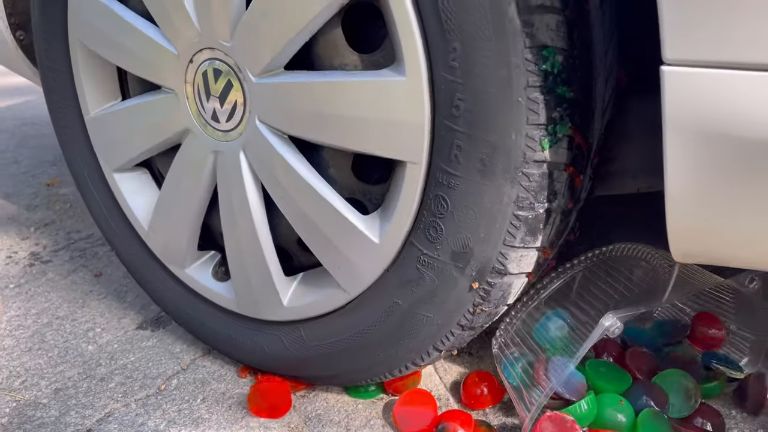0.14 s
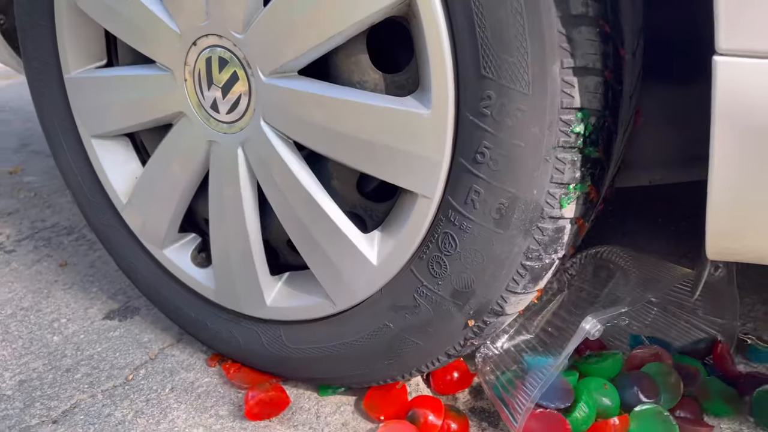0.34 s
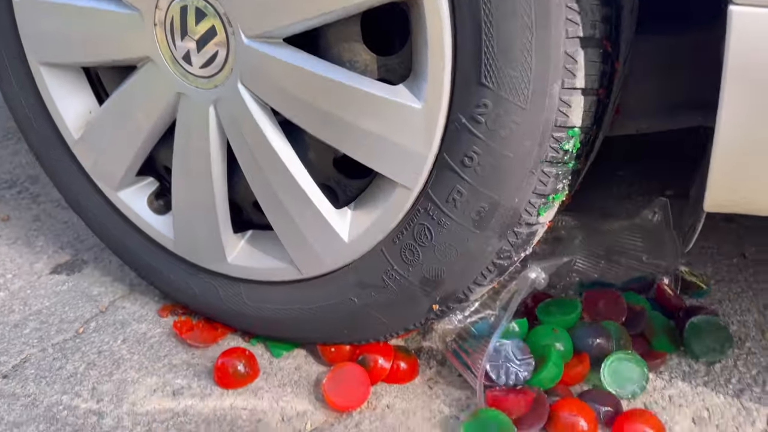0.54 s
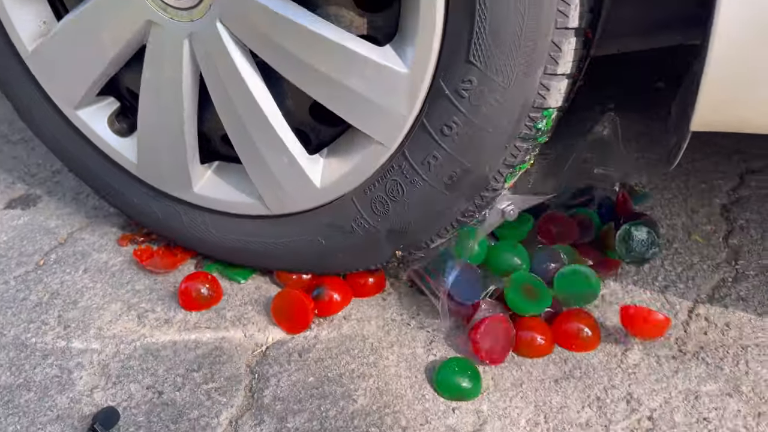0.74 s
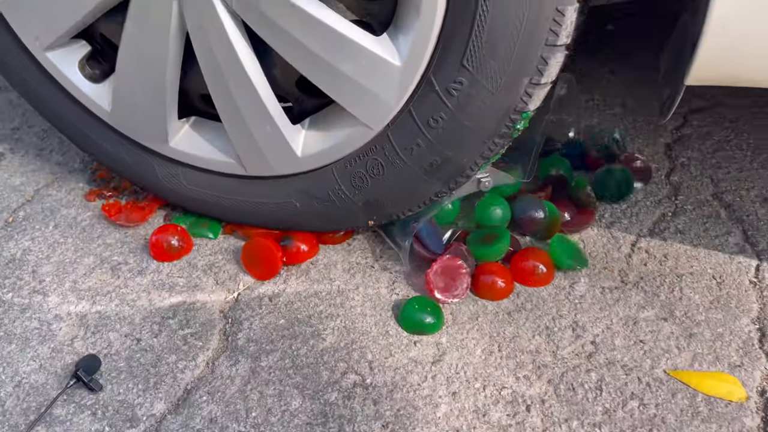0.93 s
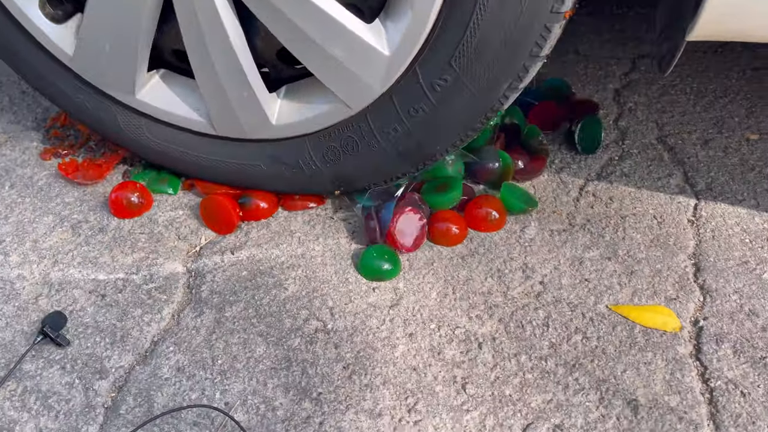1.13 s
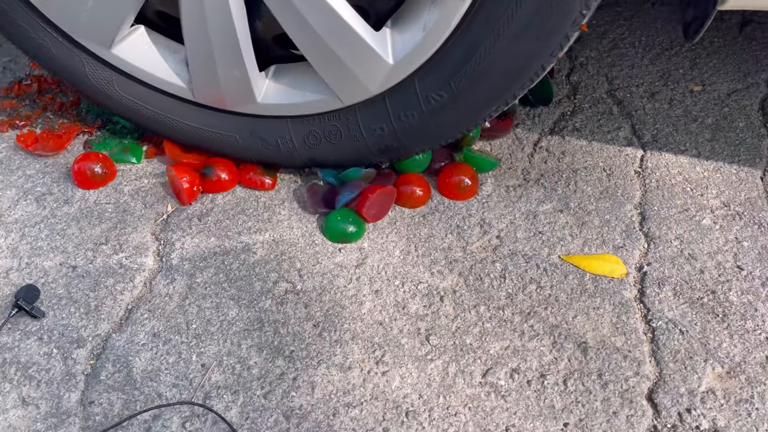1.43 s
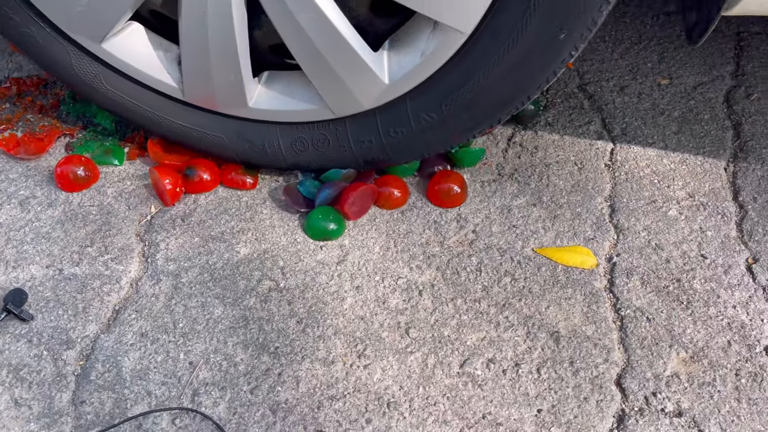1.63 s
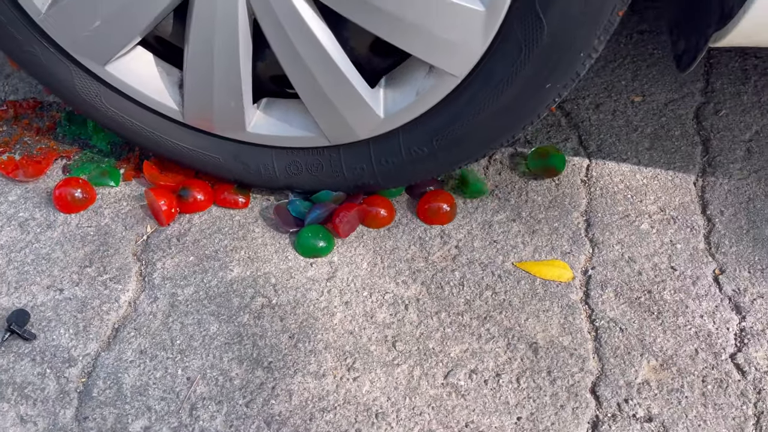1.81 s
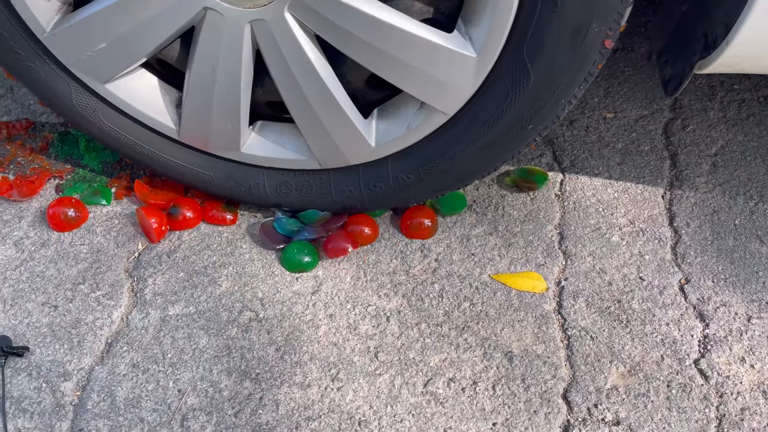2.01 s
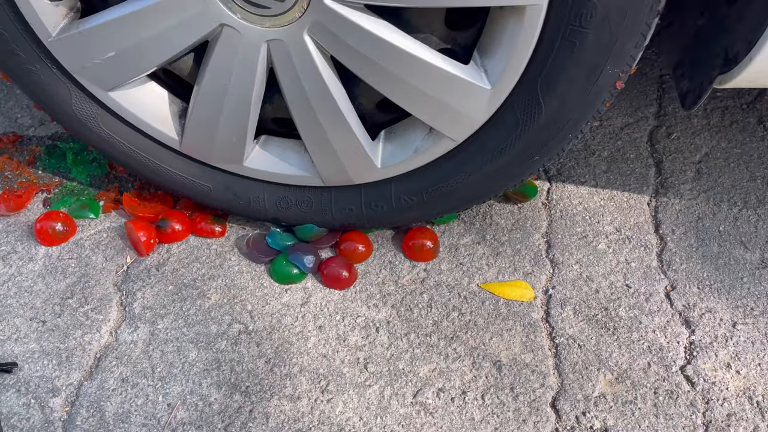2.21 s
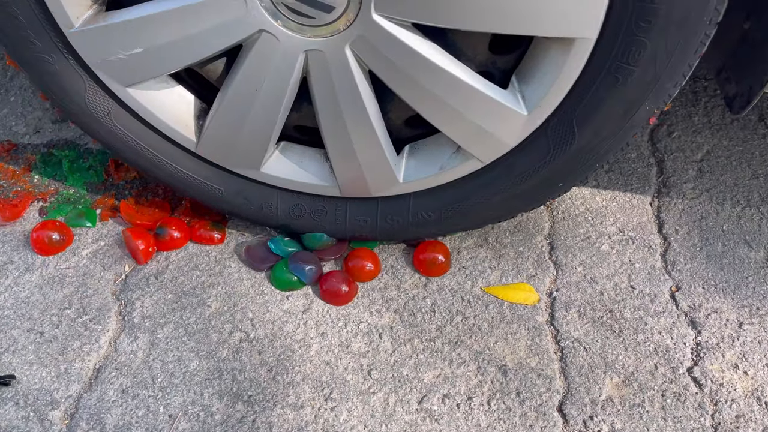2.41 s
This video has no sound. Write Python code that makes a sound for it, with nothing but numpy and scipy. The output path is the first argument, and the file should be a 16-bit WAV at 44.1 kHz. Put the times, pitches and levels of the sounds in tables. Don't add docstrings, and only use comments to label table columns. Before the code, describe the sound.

Car tyre crushing a thin plastic tray of small filled cups outdoors, very close microphone; near silence, then dense sharp snaps and hollow pops, thinning to sparse crackles, faint sticky ticks and a last light crackling.

```python
import sys
import numpy as np
from scipy import signal
from scipy.fft import rfft, irfft, next_fast_len
from scipy.io import wavfile
from scipy.ndimage import uniform_filter1d, map_coordinates

SR = 44100
rng = np.random.default_rng(int(sys.argv[2]) if len(sys.argv) > 2 else 0)


def elevation(decibels):
    levels = np.asarray(decibels, float)
    return 10 ** (levels / 20)


def digitize_waveform(pressure):
    field = np.atleast_2d(pressure).T
    bounded = np.clip(field, -1, 1)
    quanta = np.round(bounded * 32767).astype(np.int16)
    wavfile.write(sys.argv[1], SR, quanta)


N = 112454
T = np.arange(N) / SR

# (time [s], level [dB], pitch [Hz], life [ms])
TRAY_BUCKLES = [(0.18, -36.5, 766, 107), (0.234, -16.5, 2300, 9.1), (0.253, -16, 1850, 6.4),
                (0.283, -8, 1460, 11.5), (0.33, -12, 2060, 4.3), (0.34, 1.5, 2590, 1.3),
                (0.3797, -13.5, 1855, 14.6), (0.411, -10.5, 2430, 6.6), (0.4288, -4.5, 2240, 2.7),
                (0.4731, -7.5, 1190, 7), (0.4943, -2, 1007, 4.2), (0.5114, -11.5, 1334, 20),
                (0.5613, -4.5, 1780, 9.7), (0.5993, -7.5, 2420, 2), (0.63, -2, 1495, 4.3),
                (0.6579, -12.5, 1590, 5.4), (0.6776, -5, 1674, 4.1), (0.6882, -2.5, 2040, 3.9),
                (0.6958, -11.5, 729, 12.4), (0.7426, -9.5, 950, 31.5), (0.755, 1, 2198, 5.1),
                (0.9576, -14.5, 1710, 4)]
# (time [s], level [dB], pitch [Hz], life [ms])
CUP_BUCKLES = [(0.9774, -7, 2320, 2.6), (1.0311, -10.5, 2050, 4.9), (1.1291, -32, 1500, 12),
               (1.1814, -11, 1598, 9.9), (1.2447, -5, 1503, 6.9), (1.4005, -24.5, 2410, 7.4),
               (1.4203, -11, 1757, 7.1), (1.4384, -7, 2625, 4.1), (1.458, -15, 2150, 8.1),
               (1.5218, -15.5, 1843, 6.8), (1.5314, -14, 1195, 9.9), (1.546, -18, 2120, 8.7),
               (1.5643, -19.5, 1890, 5), (1.6265, -28, 2810, 24), (1.6454, -19.5, 2100, 5.6),
               (1.812, -39, 970, 27), (1.8977, -22.5, 1810, 3), (1.9523, -27, 1094, 19),
               (1.9923, -19, 1570, 3.4), (2.0054, -16.5, 1140, 3.4)]
HOLLOW_HZ, HOLLOW_DB = 517, -9


def buckles():
    s, db, hz, ms = np.vstack([TRAY_BUCKLES, CUP_BUCKLES]).T
    pops = bursts(s, db, hz, ms * 0.00067, spread=0.55, off_db=6, rattle=0.78, rise=0.12, count=11)
    s, db, hz, ms = np.transpose(TRAY_BUCKLES)
    boom = bursts(s, db + HOLLOW_DB, HOLLOW_HZ, ms / 1000,
                  spread=0.5, off_db=3, rattle=0.92, rise=0.35, count=5)
    return pops + boom


# (time [s], level [dB], pitch [Hz])
FRONT_SNAPS = [(0.1514, -22, 11030), (0.2346, -8.5, 4350), (0.2714, -7, 9080), (0.2835, -5, 4700),
               (0.3178, -12.5, 7200), (0.3489, 0, 8260), (0.3551, -3, 9600), (0.3819, -3, 7950),
               (0.4116, -6, 7560), (0.428, 2.5, 8460), (0.5122, 12.5, 7410), (0.5225, -1.5, 6690),
               (0.5449, -9, 6900), (0.5572, -4, 7940), (0.561, 10, 6700), (0.6304, 4, 3770),
               (0.6475, -6.5, 7800), (0.6622, -6, 6400), (0.6695, -5, 4420), (0.6788, 7, 9820),
               (0.6882, 13.5, 4635), (0.7423, 3, 4740), (0.7549, 11, 5025)]
# (time [s], level [dB], pitch [Hz])
MIDDLE_SNAPS = [(0.7899, -3, 6700), (0.8167, -3.5, 4770), (0.8404, -3, 8320), (0.8561, 3, 4650),
                (0.8849, -0.5, 8750), (0.9105, -5, 10150), (0.9273, -5.5, 7000), (0.9709, -4.5, 6470),
                (0.9771, 0.5, 6500), (1.0097, -1, 7800), (1.024, -18, 7900), (1.031, 0, 7000),
                (1.0446, 0, 9400), (1.0621, 0, 5960), (1.0736, 1.5, 4140), (1.0917, -14, 7860),
                (1.1326, -5.5, 6920), (1.145, -5.5, 5480), (1.204, -9, 6120), (1.2446, 5, 4110)]
# (time [s], level [dB], pitch [Hz])
LAST_SNAPS = [(1.2605, -9.5, 8900), (1.2853, -6, 3950), (1.2966, -8, 6800), (1.3163, -12, 5000),
              (1.3811, -12, 7060), (1.4382, -5, 3880), (1.479, -4, 3580), (2.088, -19.5, 12000),
              (2.1372, -12.5, 11150), (2.1572, -14.5, 5900), (2.175, -8.5, 8900), (2.199, -13.5, 8500),
              (2.2058, -16.5, 6050), (2.2269, -13, 10100), (2.234, -15, 6700), (2.263, -10, 8900),
              (2.2705, -19, 5800), (2.3074, -13.5, 6600), (2.3971, -12, 6630), (2.4389, -12.5, 4140),
              (2.4661, -13.5, 7900)]
SHIVER_DB = [
    -12.5,
    -14,
    -26,
]


def snaps():
    groups = FRONT_SNAPS, MIDDLE_SNAPS, LAST_SNAPS
    s, db, hz = np.vstack(groups).T
    crack = bursts(s, db + 4, hz, 0.00072,
                   spread=0.439, off_db=10.5, rattle=0, rise=0.047, count=15, in_step=True)
    shiver_db = db + np.repeat(SHIVER_DB, [len(g) for g in groups])
    shiver = bursts(s, shiver_db, hz * 0.8, 0.0048, spread=0.6, off_db=0.5, rattle=1.1, rise=0.1, count=17)
    return crack + shiver


# (time [s], level [dB], pitch [Hz])
SPLINTERS = [(0.0773, -31, 9900), (0.1879, -28.5, 3340), (0.2775, -8, 2820), (0.296, -18, 6090),
             (0.3317, -10, 3730), (0.3386, -7, 2800), (0.4686, -6, 3520), (0.4739, -4, 3140),
             (0.5274, -10, 3600), (0.55, -11, 9700), (0.5922, -8, 3290), (0.6006, -9, 2780),
             (0.6575, -4.5, 3190), (0.8293, -7, 2820), (0.8364, -13, 3920), (0.9312, -9, 3570),
             (0.9585, -6, 2870), (1.0014, -6.5, 5490), (1.0586, -10, 8900), (1.068, -7, 4220),
             (1.0802, -9, 4130), (1.1121, -14, 5640), (1.1289, -10, 3070), (1.1544, -12, 6930),
             (1.1807, -9, 2930), (1.2086, -13, 7250), (1.2371, -20, 3400), (1.25, -3, 3420),
             (1.2924, -10.5, 2800), (1.422, -16, 6360), (1.4587, -10, 2860), (1.5217, -14.5, 2820),
             (1.5446, -17.5, 3560), (1.6266, -22, 3210), (1.6466, -19, 4370), (1.8865, -19.5, 3100),
             (1.9224, -29, 6940), (1.9515, -32, 5230), (1.9724, -29, 3380), (1.9933, -28, 2820),
             (2.02, -21, 6250), (2.0933, -28, 4800), (2.13, -32, 5900), (2.1627, -21, 5490),
             (2.1816, -21, 5580), (2.2558, -15.5, 4050), (2.3268, -22, 4400), (2.4625, -17.5, 5730)]


def splinters():
    s, db, hz = np.transpose(SPLINTERS)
    body = bursts(s, db, hz, 0.0012, spread=0.386, off_db=9.5, rattle=0.22, rise=0.097, count=11)
    edge = bursts(s, db - 8, 9500, 0.0012, spread=0.245, off_db=6, rattle=0.27, rise=0.08, count=9)
    return body + edge


# (time [s], level [dB], pitch [Hz])
DENTS = [(.829, -11, 1790), (.8765, -10.5, 1600), (1.005, -14, 2500), (1.0466, -14.5, 1910),
         (1.109, -16.5, 3180), (1.8421, -27.5, 1210), (1.86, -25, 1870), (1.9379, -23, 1620),
         (2.186, -26.5, 1840)]
# (time [s], level [dB], pitch [Hz], life [ms])
RINGS = [(0.151, -24, 4580, 1.6), (.339, -6.5, 2430, 2.8), (.473, -7, 3300, 3), (.513, -10, 700, 6.4),
         (.535, -21.5, 732, 37), (.631, -14.5, 444, 10.6), (0.689, -11, 1850, 5.3), (.742, -10, 2170, 2.5),
         (1.128, -20, 1172, 8.1), (1.181, -7, 2910, 2.4), (1.813, -35, 983, 7.8), (1.951, -25.5, 978, 13)]


def rings():
    s, db, hz = np.transpose(DENTS)
    dents = bursts(s, db, hz, 0.0027, spread=0.412, off_db=6, rattle=1.0, rise=0.16, count=9)
    s, db, hz, ms = np.transpose(RINGS)
    panels = bursts(s, db, hz, ms / 1000, spread=0.053, off_db=5, rattle=0.45, rise=0.11, count=3)
    return dents + panels


SAG = 0.1104
JOLT = 40


def bursts(s, db, hz, life_s, spread, off_db, rattle, rise, count, in_step=False):
    t = np.arange(SR // 20) / SR
    out = np.zeros(N + SR)
    for s0, d, f, life in zip(*np.broadcast_arrays(s, db, hz, life_s)):
        z = rng.standard_normal((count, 4))
        away = np.linspace(-2, 2, count)[:, None] * (1 + z[:, :1] / 10)
        modes = np.clip(f * np.exp(spread * away), 100, SR * 0.4)
        lives = life * np.minimum(1, np.sqrt(f / modes))
        sagging_t = t - SAG * (t - life * (1 - np.exp(-t / life)))
        start = np.pi / 2 * np.sign(z[0, 2]) if in_step else z[:, 3:]
        phase = 2 * np.pi * modes * sagging_t + start
        jolts = np.repeat(rng.standard_normal((count, len(t) // JOLT + 1)), JOLT, 1)[:, :len(t)]
        jolts = uniform_filter1d(jolts, JOLT // 2, 1)
        level_db = -off_db * np.abs(away) + 2 * z[:, 1:2] - 10 * t / lives
        ring = (elevation(level_db) * (1 + rattle * jolts) * np.sin(phase)).sum(0)
        ring *= 1 - np.exp(-t / (rise * life))
        peak = np.sqrt(2 * uniform_filter1d(ring ** 2, round(life * SR / 2) + 1).max())
        out[round(s0 * SR):][:len(t)] += elevation(d) * ring / peak
    return out[:N]


# (time [s], crumb level [dB], share of fine bright crumbs [0-1])
LOAD = [(0, -44.5, 0.65), (.17, -48.5, 1), (.3, -32.5, 0.061), (.6, -26, 0.1), (1.1, -31, 0.32),
        (1.35, -31.5, 0.65), (1.47, -27.5, 0.56), (1.6, -41, 0.75), (1.78, -43, 0.2), (1.95, -35, 0.044),
        (2.07, -39.5, 0.53), (2.26, -30, 0.89), (2.55, -32.5, 0.6)]
# (frequency [Hz], level [dB])
CRUMBS = [(200, -4), (700, 1), (2200, 5.5), (6000, -9)]
# (frequency [Hz], level [dB])
FINES = [(1500, -22), (5000, -18), (15000, -28)]
SETTLE_S, CALM = 0.0031, 0.46


def crumbs(breaks):
    db, fine = curves(LOAD)
    fine = np.clip(fine, 0, 1)
    shaken = fading(breaks ** 2, SETTLE_S)
    usual = np.abs(uniform_filter1d(shaken, SR // 8)) + elevation(2 * db)
    flare = np.sqrt(CALM + shaken / usual)
    coarse_bed = np.sqrt(1 - fine) * grit(600, spiky_db=2.4, hiss=0.45, points=CRUMBS)
    fine_bed = np.sqrt(fine) * grit(900, spiky_db=2.2, hiss=0.08, points=FINES)
    return elevation(db + 2.3 * np.tanh(wobble(60))) * flare * (coarse_bed + fine_bed)


def grit(rate, spiky_db, hiss, points):
    size_db = spiky_db * np.minimum(rng.exponential(size=N), 3)
    hits = unit((rng.random(N) < rate / SR) * elevation(size_db))
    power = fading(hits ** 2, 0.00011) + 0.11 * fading(hits ** 2, 0.00057) + hiss
    return unit(coloured(np.sqrt(power) * rng.standard_normal(N), points))


# (from [s], to [s], rate [1/s], level [dB])
PEELS = [
    (1.685, 1.86, 93, -18),
    (2.335, 2.39, 190, -16),
]
# (from [s], to [s], level [dB])
SQUEAKS = [
    (1.67, 1.76, -56),
    (1.83, 1.9, -54),
    (1.96, 2.03, -52),
]
SQUEAK_HZ, SQUEAK_WIDTH_HZ = 6700, 170


def tread():
    ticks = np.zeros(N)
    for start, end, rate, db in PEELS:
        s = np.arange(start, end, 1 / rate)
        z = rng.standard_normal((len(s), 2))
        late_s = z[:, 0] * 0.0007
        ticks[((s + late_s) * SR).astype(int)] = elevation(db + 1.8 * z[:, 1])
    gate = sum(elevation(db) * ((T > start) & (T < end)) for start, end, db in SQUEAKS)
    gate = uniform_filter1d(gate, 400)
    skirt = 3 * SQUEAK_WIDTH_HZ
    note = [(SQUEAK_HZ - skirt, -30), (SQUEAK_HZ, 0), (SQUEAK_HZ + skirt, -30)]
    squeak = gate * elevation(3 * wobble(60)) * unit(coloured(rng.standard_normal(N), note))
    return coloured(ticks, [(2000, -10), (15000, 0)]) + squeak


# (frequency [Hz], time to fall 60 dB [s])
UNDERSIDE = [(300, 0.049), (12000, 0.018)]


def underside(x):
    f, t60 = np.transpose(UNDERSIDE)
    out, hop = np.zeros(N + SR), SR // 20
    for at in range(0, N, hop):
        hz, t, z = signal.stft(rng.standard_normal(SR // 8), SR, nperseg=128)
        decay = elevation(-60 * t / np.interp(hz, f, t60)[:, None])
        tail = signal.istft(z * decay, SR, nperseg=128)[1]
        wet = signal.fftconvolve(x[at:at + hop], tail / np.linalg.norm(tail))
        out[at:][:len(wet)] += wet
    return out[:N]


# (time [s], level [dB])
AIR = [
    (0, -50),
    (1.3, -50),
    (1.72, -52),
    (1.95, -37),
    (2.2, -41),
    (2.4, -59),
]
# (frequency [Hz], level [dB])
RUMBLE = [(25, -3), (80, -7), (250, -16.5)]
# (frequency [Hz], level per Hz [dB])
OUTDOORS = [(100, 8.5), (600, -5), (15500, -30.5)]


def air():
    db, = curves(AIR)
    buffet = unit(elevation(2.3 * wobble(21.93)) * coloured(rng.standard_normal(N), RUMBLE))
    street = unit(coloured(rng.standard_normal(N), OUTDOORS))
    return elevation(db) * buffet + elevation(-49.5) * street


def unit(x):
    return x / np.sqrt(np.mean(x ** 2) + 1e-20)


def along(points, hz):
    f, v = np.transpose(points)
    f = np.r_[f[0] / 4, f, f[-1] * 2]
    v = np.r_[v[0] * 2 - 20, v, v[-1] * 2 - 20]
    return np.interp(np.log(hz + 1), np.log(f), v)


def coloured(x, points):
    m = next_fast_len(N + SR // 4)
    return irfft(rfft(x, m) * elevation(along(points, np.fft.rfftfreq(m, 1 / SR))), m)[:N]


def curves(rows):
    s, *cols = np.transpose(rows)
    return [np.interp(T, s, c) for c in cols]


def wobble(rate):
    return map_coordinates(rng.standard_normal(int(N * rate / SR) + 4), [T * rate])


def fading(power, seconds):
    k = np.exp(-1 / (seconds * SR))
    return signal.lfilter([1 - k], [1, -k], power)


def scene():
    thin_walls = signal.butter(2, 210, "high", fs=SR, output="sos")
    breaks = signal.sosfilt(thin_walls, buckles() + snaps() + splinters() + rings())
    near = breaks + crumbs(breaks) + tread()
    return (near + elevation(-12.5) * underside(near) + air())[None]


def roll_off(x):
    return signal.sosfilt(signal.butter(12, 16440, fs=SR, output="sos"), x)


def record(dry):
    clipped = dry / (1 + np.abs(dry) ** 8) ** (1 / 8)
    mix = signal.sosfiltfilt(signal.butter(20, 16100, fs=SR, output="sos"), clipped)
    return roll_off(mix)


dry = scene()
out = record(dry)
digitize_waveform(out)
```